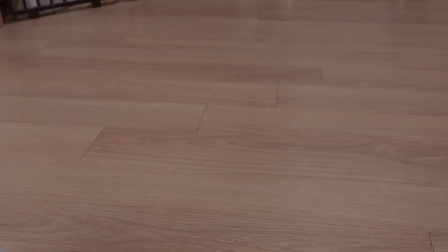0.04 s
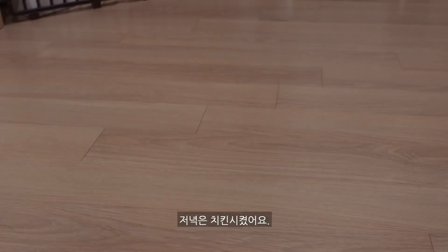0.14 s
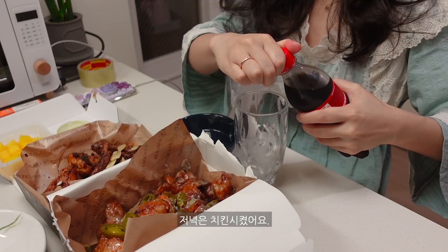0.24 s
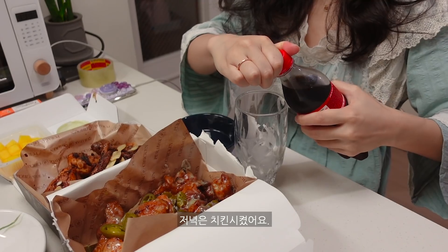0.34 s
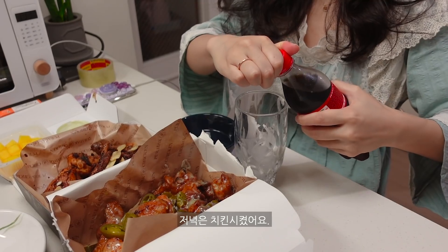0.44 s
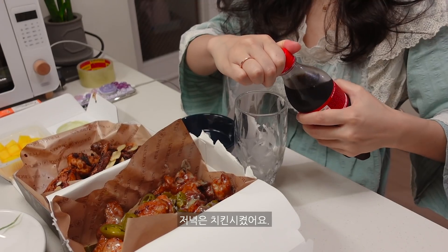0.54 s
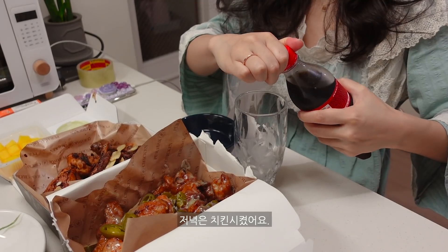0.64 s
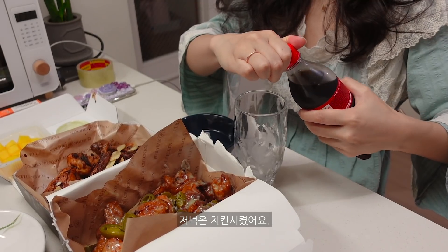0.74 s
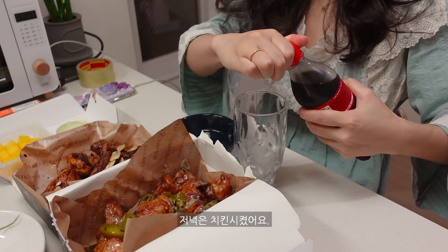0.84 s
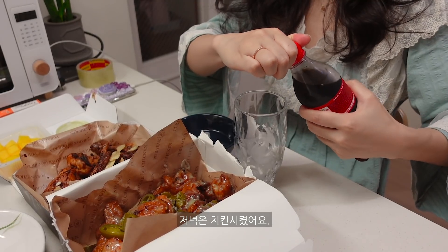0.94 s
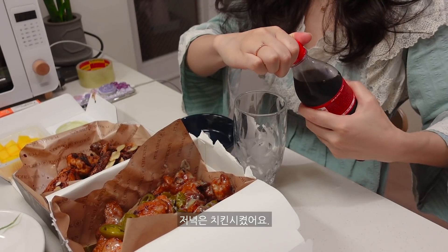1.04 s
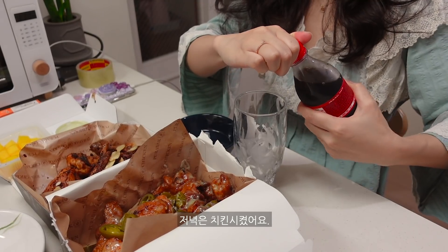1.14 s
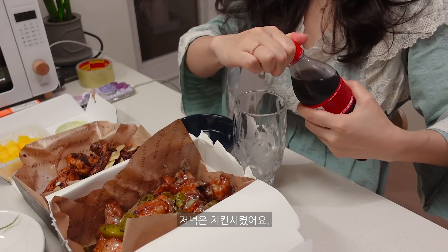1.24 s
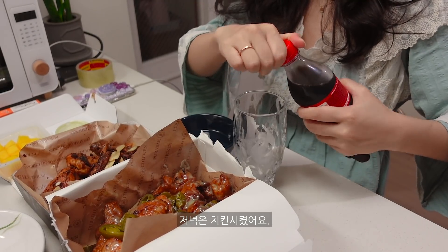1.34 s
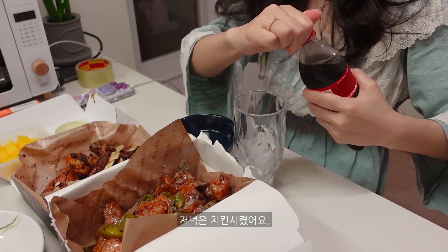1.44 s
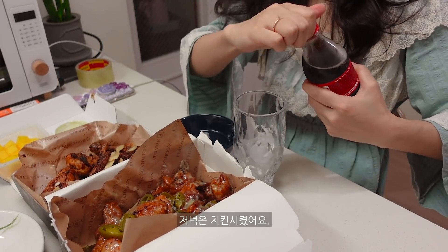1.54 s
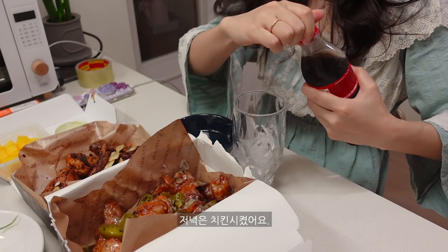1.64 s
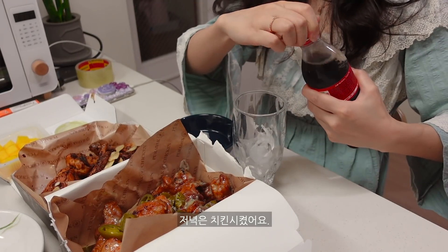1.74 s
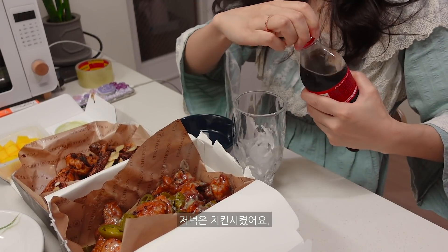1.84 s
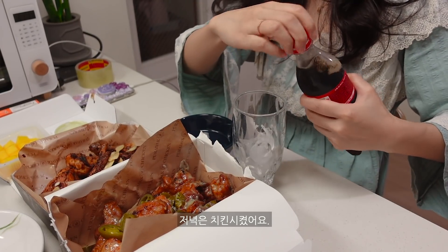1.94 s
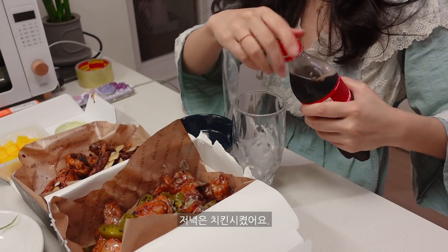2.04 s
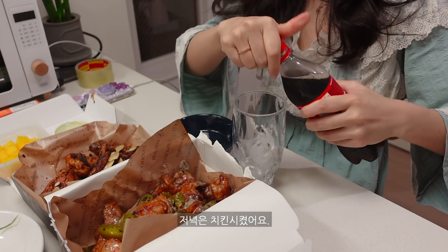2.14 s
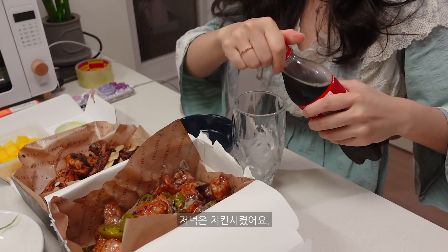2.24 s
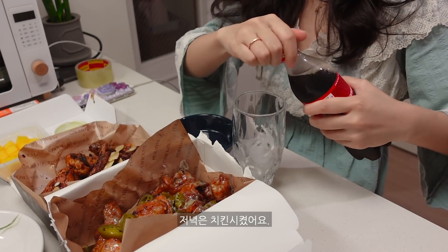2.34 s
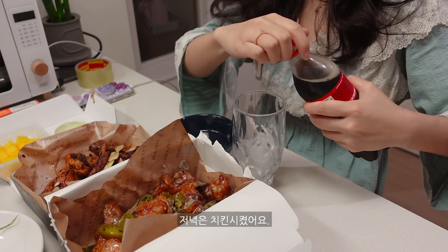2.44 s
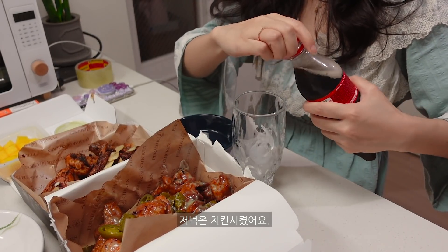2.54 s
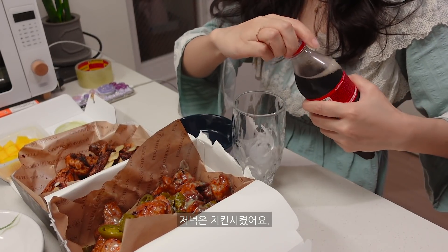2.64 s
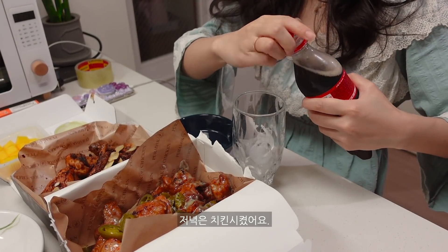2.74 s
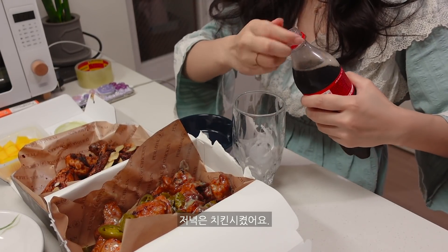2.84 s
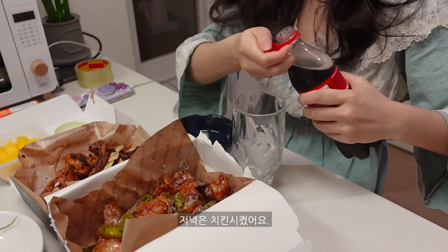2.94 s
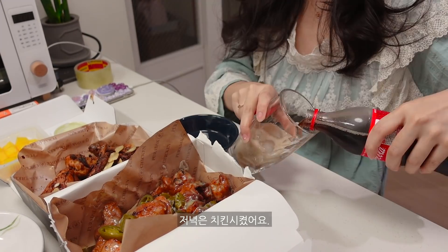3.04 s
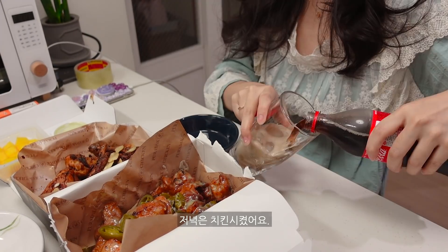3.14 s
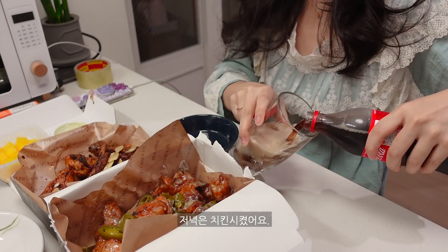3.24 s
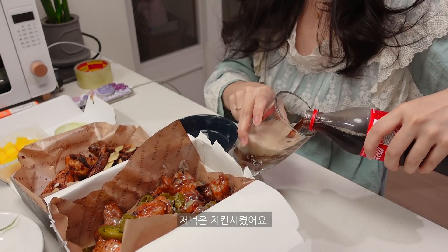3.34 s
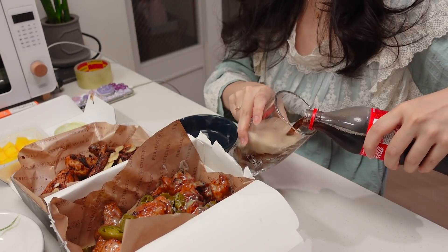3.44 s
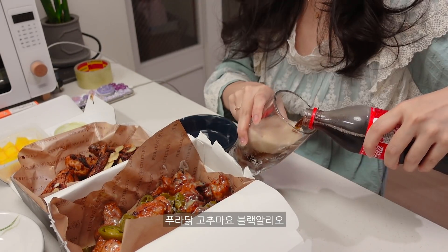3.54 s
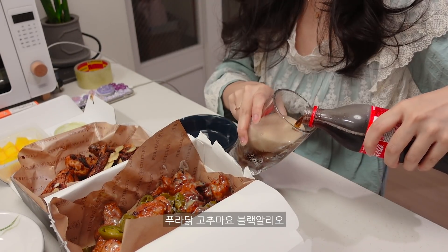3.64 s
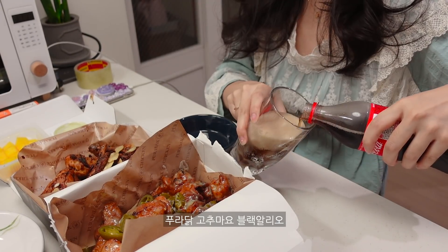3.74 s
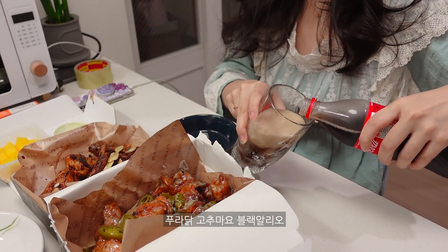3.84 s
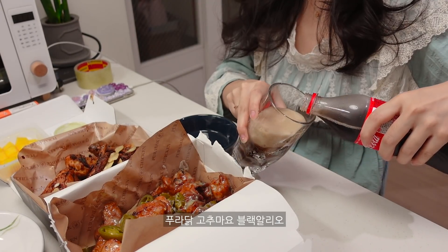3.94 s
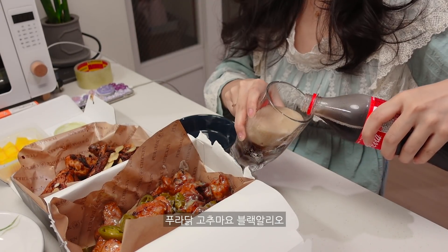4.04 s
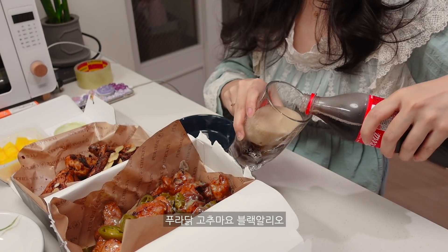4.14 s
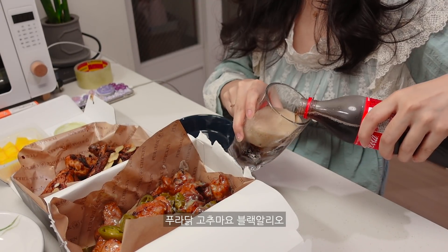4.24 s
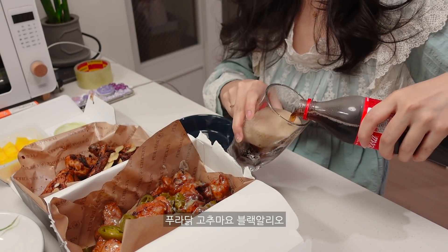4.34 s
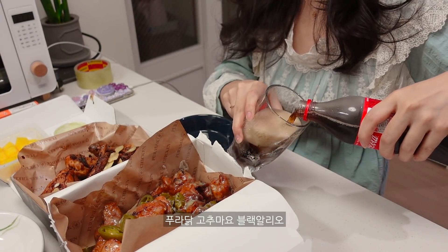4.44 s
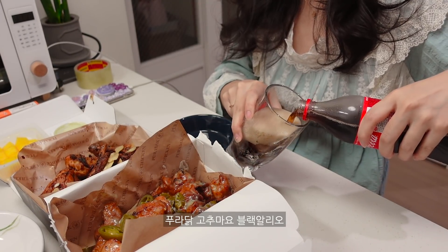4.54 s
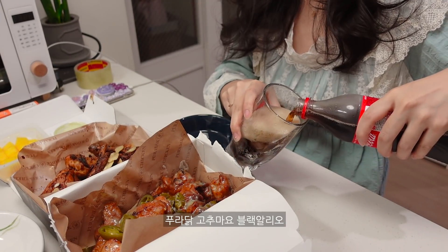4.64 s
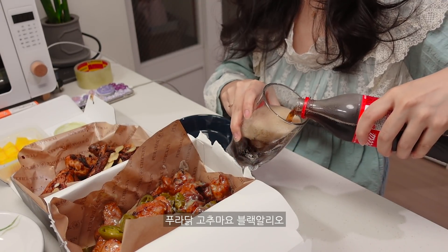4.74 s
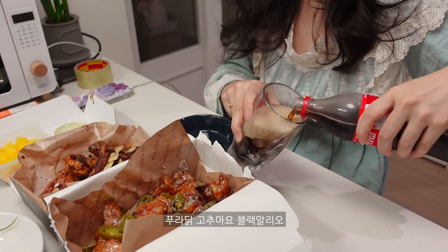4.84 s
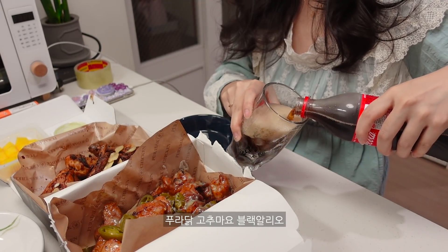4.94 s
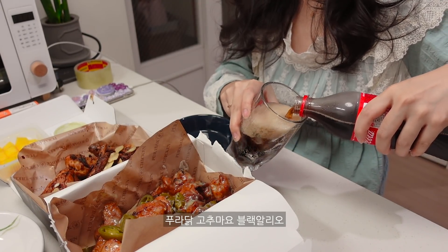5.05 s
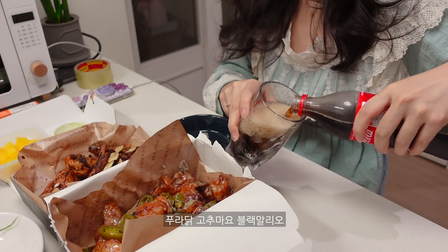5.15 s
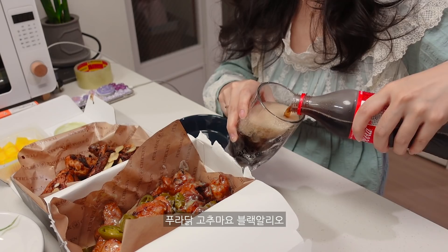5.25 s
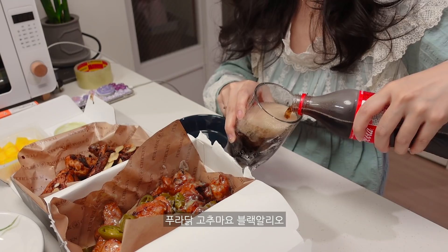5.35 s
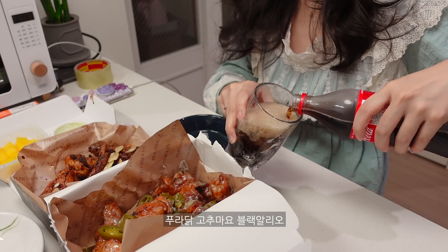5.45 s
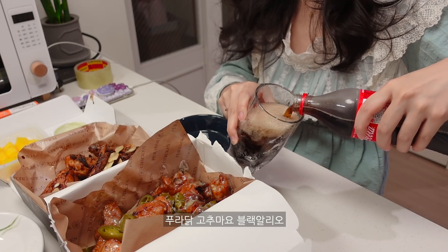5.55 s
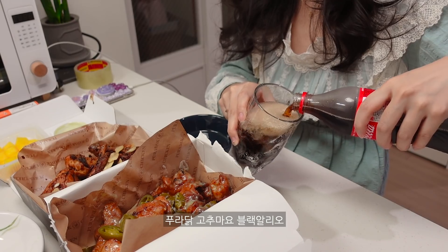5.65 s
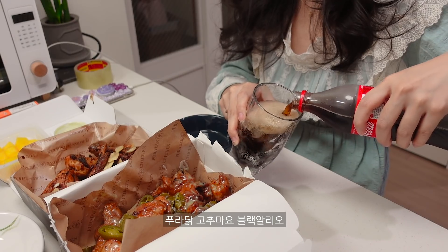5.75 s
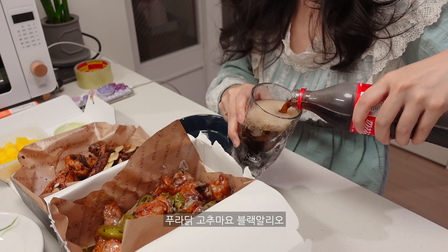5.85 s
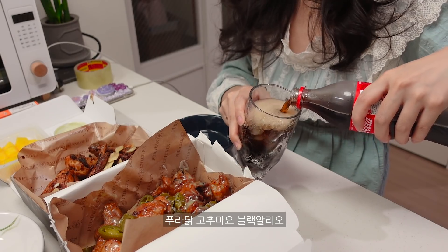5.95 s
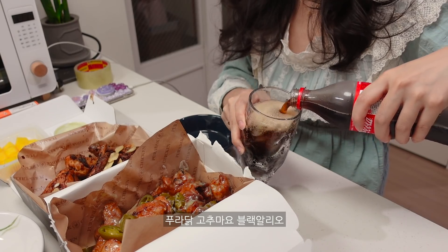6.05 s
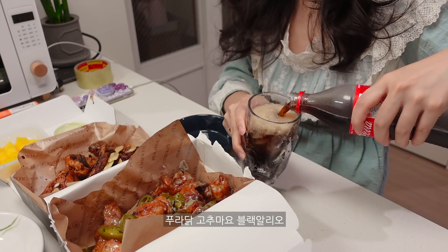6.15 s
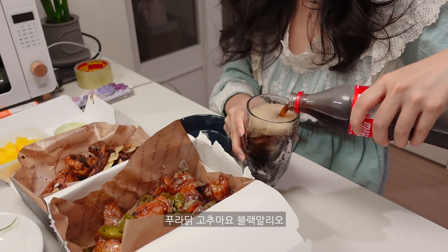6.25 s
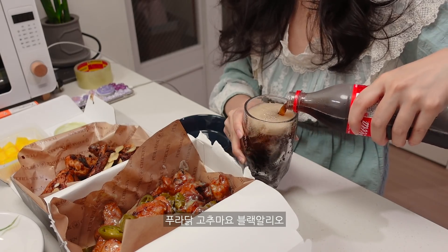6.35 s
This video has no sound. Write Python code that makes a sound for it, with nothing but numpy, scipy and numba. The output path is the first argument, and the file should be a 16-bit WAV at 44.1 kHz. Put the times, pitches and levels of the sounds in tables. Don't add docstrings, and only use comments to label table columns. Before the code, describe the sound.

A pet's small bell jingles briefly, then a plastic soda cap hisses and cracks open, and fizzy drink glugs into a glass in a kitchen.

```python
import sys
import numpy as np
from scipy import signal
from scipy.fft import rfft, irfft
from scipy.io import wavfile
from scipy.ndimage import uniform_filter1d
from numba import njit

SR = 44100
rng = np.random.default_rng(int(sys.argv[2]) if len(sys.argv) > 2 else 0)


def wav_record(signal):
    frames = np.transpose(np.atleast_2d(signal))
    bounded = np.clip(frames, -1, 1)
    quanta = np.round(bounded * 32767).astype(np.int16)
    wavfile.write(sys.argv[1], SR, quanta)


def elevation(decibels):
    levels = np.asarray(decibels, float)
    return 10 ** (levels / 20)


N = 282240
T = np.arange(N) / SR

CUTS_S = [
    .2425,
    3.113,
]

# (time [s], level [dB], brightness [dB])
BELL_SHAKES = [
    (.001, -26.5, -4),
    (.012, -28.5, -12),
    (0.026, -33, -4),
    (0.049, -40, -8),
    (0.077, -30.5, 5),
    (0.092, -35, 1),
    (.11, -37.5, 10),
    (.128, -39, 0),
    (.145, -59, -2),
    (0.171, -54, 2),
]
# (frequency [Hz], level [dB], t60 [s])
BELL_MODES = [(2842, 3.5, 0.3), (2640, -8, 0.17), (2740, -8, 0.13), (5370, 1.5, 0.059), (5440, 0, 0.094),
              (5920, -3, 0.095), (5480, -2, 0.046), (5900, -11, 0.061), (7900, -1.5, 0.19), (7770, -8, .15),
              (11100, -25, 0.18), (11530, -13, 0.16), (12600, -28, .25), (13700, -32.5, 0.34)]
# (time [s], level [dB])
PAWS = [
    (0.0, -40.5),
    (0.01, -45),
    (0.052, -49),
    (0.146, -51),
    (0.216, -56),
    (0.24, -45),
]
# (frequency [Hz], density [dB per Hz])
PAWS_TONE = [(60, -41), (200, -13.5), (700, 1), (1600, -4.5), (3000, -4.5), (5500, 0.5), (7500, -6),
             (9000, -16), (11500, -21), (12500, -61)]

# (time [s], pitch [Hz], level [dB], t60 [s])
HOLLOW_TAPS = [
    (0.229, 782, -33, 0.056),
    (0.229, 1197, -32.5, 0.038),
    (0.225, 1760, -41, 0.089),
    (1.39, 487, -57, 0.18),
    (2.84, 1129, -50, 0.62),
    (2.96, 652, -50.5, 0.22),
    (3.049, 637, -47.5, 0.23),
    (3.114, 946, -45, 0.14),
]

# (time [s], level [dB])
GAS_FLOW = [
    (0.243, -29.5),
    (0.275, -27.5),
    (0.45, -38),
    (0.56, -40),
    (0.698, -44),
    (0.85, -38),
    (0.89, -33.5),
    (1.044, -30.5),
    (1.2, -71),
]
# (frequency [Hz], density [dB per Hz])
GAS_TONE = [(300, -63), (900, -18.5), (1700, -11), (2400, -5), (3500, -2.5), (5000, -2.5), (10000, 2),
            (15000, -4.5), (16400, -42)]
# (centre [Hz], width [Hz], level [dB], share by which the pitch sinks [0-1])
THREAD_GAPS = [(2900, 410, 9, 0.24), (4710, 540, 8.5, 0.081), (5720, 360, 1.5, 0.028),
               (6920, 750, -1.5, .02), (7800, 1100, -4.5, .02), (9000, 140, -5, 0.024),
               (10300, 310, -1, 0.02), (10770, 200, -4, 0.018)]
# (time [s], lift [0-1])
CAP_LIFT = [
    (.25, 0.06),
    (.6, 0.08),
    (.85, 0.63),
    (1.1, 0.93),
]
JET_TREBLE_DB, JET_DULLS_DB, SPIT_DB, SPIT_S = -2.5, -4.5, 8.5, 0.011

# (frequency [Hz], density [dB per Hz])
KITCHEN_TONE = [(18, -70), (30, -36.5), (282, -15), (532, -16), (975, -2.5), (1240, -3), (1410, -4),
                (1610, -5), (2330, -8), (2590, -10.5), (2800, -10), (7430, -21.5), (15200, -56),
                (16400, -56)]
KITCHEN_DB = -56.5
# (frequency [Hz], density [dB per Hz])
MIC_HISS = [(3000, -24), (7000, 1), (11000, 6), (15500, -1), (16500, -20)]

# (time [s], peak [dB], ring [Hz], treble [dB], scrape [s])
CAP_SNAPS = [(1.312, -42, 5500, -22, .002), (1.389, -36.5, 3950, -9.5, 0.012),
             (1.51, -32.5, 3290, -11.5, 0.042), (1.570, -36.5, 3660, -6, 0.0048),
             (1.740, -46.5, 3040, -44, 0.0068), (1.784, -25.5, 6330, -15, 0.0034),
             (1.97, -16.5, 5110, -11, 0.0037), (2.351, -56, 5000, -19, .001),
             (2.369, -48, 5470, -15, 0.00077), (2.394, -46, 5060, -21, 0.0012),
             (2.426, -22.5, 5820, -17, 0.0023), (2.633, -43.5, 4000, -25, 0.0065),
             (2.637, -37.5, 2150, -30, 0.0045), (2.713, -17.5, 4880, -10, 0.003),
             (2.855, -18, 4460, -12.5, 0.0043), (2.88, -21, 3480, -9, 0.0018),
             (2.9613, -16.5, 3500, -6, 0.0032), (2.9948, -17, 4050, -15, 0.0039),
             (3.028, -30.5, 3250, -23, .002), (3.046, -14, 3150, -6.5, 0.0029),
             (3.051, -36, 2680, -20, 0.047)]
# (time [s], pitch [Hz], level [dB])
SQUEAK = [
    (2.11, 2510, -77),
    (2.136, 2520, -59),
    (2.25, 2540, -67),
    (2.29, 2360, -87),
]
WALL_DB, WALL_DB_PER_MS = -29.5, 2.6

# (time [s], level [dB])
STREAM_FLOW = [
    (3.11, -54.5),
    (3.38, -58),
    (3.65, -53),
    (4.97, -52),
    (6.12, -54.5),
    (6.4, -60.5),
]
# (frequency [Hz], density [dB per Hz])
STREAM_TONE = [(35, -83), (60, -55), (303, -50), (508, -7), (740, -14.5), (1100, 0), (1530, -6.5),
               (2340, 4), (4620, 0.5), (6560, -4), (13600, -13.5), (15300, -6), (16400, -48)]
# (frequency [Hz], density [dB per Hz])
FOAM_TONE = [(5000, -25), (7000, -9.5), (9300, 3.5), (11000, -5), (13600, -2.5), (16400, -19.5)]
HEAD_DB, HEAD_SWELL_DB, HEAD_PEAK_S, HEAD_SPREAD_S = -67.5, 7.5, 3.68, 0.49
# (time [s], peak [dB], splash over bubble [dB], length [s])
GLUGS = [(3.218, -48.5, -8, 0.11), (3.313, -53.5, 1, 0.088), (3.386, -46, -5, 0.066),
         (3.44, -49.5, 6.5, 0.046), (3.561, -42.5, -9, 0.066), (3.627, -42, 11, 0.021),
         (3.777, -35, 1, 0.019), (3.853, -34, -2.5, 0.027), (3.927, -37, 6, 0.019),
         (4.001, -40.5, 2, 0.036), (4.111, -33.5, -2, 0.04), (4.26, -46, -3, 0.037), (4.353, -36, 6, 0.024),
         (4.451, -34.5, 3.5, 0.029), (4.511, -36.5, -11, 0.019), (4.58, -33, -5, 0.032),
         (4.761, -43, 2, 0.033), (4.908, -42, 5, 0.039), (5.03, -42, 4, 0.034), (5.093, -42, 8, .02),
         (5.17, -28, -2.5, 0.032), (5.33, -46, 6.5, 0.064), (5.498, -38.5, 3.5, 0.021),
         (5.622, -46, 4, 0.044), (5.696, -39.5, -2, 0.028), (5.758, -44.5, -1, 0.034),
         (5.815, -44.5, 3, 0.026), (5.974, -41, 1, 0.043), (6.04, -40.5, -3.5, 0.066),
         (6.124, -42.5, -6, 0.045)]
GULP_HZ, GULP_SPREAD = 1127, .07
# (centre [Hz], width [Hz], level [dB])
GLASS = [(1108, 137, 3), (491, 124, -10), (1590, 1220, 9), (2440, 1080, 3.5), (3870, 240, -3.5),
         (4500, 290, -3.5)]
SPRAY_HZ, SPRAY_DB = 6700, -5
BUBBLES_DB, BUBBLE_LOW_HZ, BUBBLE_CYCLES = -12.5, 1306, 9.5
# (frequency [Hz], density [dB per Hz])
RUMBLE = [(40, -36), (120, -6), (220, 0.5), (400, -2), (800, -17)]

# (time [s], peak [dB], treble [dB])
KNOCKS = [
    (4.101, -37.5, -11),
    (5.17, -32, -24),
    (6.231, -15, -19),
]
# (frequency [Hz], level [dB], t60 [s])
RIM_MODES = [(1087, -5, 0.028), (1144, -6, 0.036), (537, -20, 0.07), (2150, -0.5, 0.026),
             (3500, -9, 0.0072), (4660, 1.5, 0.022), (5860, -15, .02)]

# (frequency [Hz], t60 [s])
ROOM_T60 = [(250, 0.37), (1000, 0.33), (3000, 0.48), (7000, 0.36), (14000, 0.4)]
ROOM_DB = -5.5


def unit(x):
    return x / np.sqrt(np.mean(x ** 2))


def curves(table, off_db=-120):
    s, *columns = np.transpose(table)
    return [np.interp(T, s, c, off_db, off_db) for c in columns]


def noise(tone, alike=1.):
    hz, db = np.transpose(tone)
    log_hz = np.log(np.fft.rfftfreq(N, 1 / SR) + 1)
    gain = elevation(np.interp(log_hz, np.log(hz), db, -70, -90))
    mid, side = irfft(rfft(rng.standard_normal((2, N))) * gain, N)
    alike = np.clip(alike, 0, 1)
    return unit(np.sqrt(1 + alike) * mid + np.sqrt(1 - alike) * side * np.array([[1], [-1]]))


def band(x, hz, width):
    return signal.lfilter(*signal.iirpeak(hz, hz / width, SR), x)


def steep_band(x, hz, width):
    return band(band(x, hz, width), hz, width)


def steep(x, hz, order=4):
    return signal.sosfilt(signal.butter(order, hz, "high", fs=SR, output="sos"), x)


@njit
def sliding(x, g, k):
    y, b, l = np.empty(len(x)), 0., 0.
    for i in range(len(x)):
        v = (b + g[i] * (x[i] - l)) / (1 + g[i] * (g[i] + k))
        b, l, y[i] = 2 * v - b, l + 2 * g[i] * v, k * v
    return y


def walk(rate):
    k = int(SR / rate)
    steps = np.repeat(rng.standard_normal(N // k + 1), k)
    return unit(uniform_filter1d(uniform_filter1d(steps, k), k)[:N])


@njit
def rings(start, hz, size, t60, glide, length):
    out = np.zeros(length)
    for k in range(len(start)):
        phase, gain, step = 0., size[k], 2 * np.pi * hz[k] / 44100
        fall = np.exp(-6.9 / (t60[k] * 44100))
        for i in range(start[k], min(length, start[k] + int(t60[k] * 44100))):
            out[i] += gain * np.sin(phase)
            phase, gain, step = phase + step, gain * fall, step * (1 + glide[k] / 44100)
    return out


def ring(s, hz, db, t60, glide=0.):
    s, hz, db, t60, glide = (np.ravel(a) * 1. for a in np.broadcast_arrays(s, hz, db, t60, glide))
    start = (s * SR).astype(np.int64)
    return rings(start, np.clip(hz, 20, 20000), elevation(db), np.maximum(t60, 1e-4), glide, N)


def puffs(s, db, rise_s, fall_s):
    env = np.zeros(N)
    for a, d, rise, fall in np.broadcast(s, db, rise_s, fall_s):
        rise, fall = max(rise, 1e-5), max(fall, 1e-4)
        i, t = int(a * SR), T[:int(8 * fall * SR)]
        puff = elevation(d) * (1 - np.exp(-t / rise)) * np.exp(-t / fall)
        env[i:i + len(t)] += puff[:N - i]
    return env


def crack(hz, body_db, treble_db, scrape, span):
    t = T[:span]
    push = rng.standard_normal(span) * np.exp(-t / scrape) * np.clip((scrape / 0.008) ** 2, 0, 1)
    push[0] += 2.5
    push[int(.0011 * SR)] -= .2
    push += 0.17 * rng.standard_normal(span) * np.exp(-t / 0.0016)
    shell = steep_band(push, hz, 1.21 * hz) + 0.5 * band(push, hz, 0.073 * hz)
    shell += elevation(body_db - 1) * steep_band(push, 1700, 2700)
    shell = signal.lfilter(*signal.butter(2, min(1.82 * hz, 15000), fs=SR), shell)
    edge = band(push, 8100, 2800) + 0.58 * band(push, 12600, 4500)
    out = shell + elevation(treble_db + 2.5) * steep(edge, 6500, order=2)
    return out / abs(out).max()


def room(x):
    t, (hz, t60) = T[:SR // 2], np.transpose(ROOM_T60)
    tail = np.zeros((2, len(t)))
    for f in 200 * np.sqrt(2) ** np.arange(13):
        decay = elevation(-60 * t / np.interp(f, hz, t60))
        tail += band(rng.standard_normal((2, len(t))), f, f / 2) * decay / np.sqrt(f)
    mid, side = tail
    tail = mid + 0.51 * steep(side, 900, order=1) * np.array([[1], [-1]])
    tail = signal.lfilter([1, -.8], 1, tail) * np.clip((t - .003) / 0.0011, 0, 1)
    tail *= elevation(ROOM_DB) / np.sqrt(np.sum(tail ** 2) / 2)
    x = x * np.ones((2, 1))
    return x + signal.fftconvolve(x, tail, axes=1)[:, :N]


def pet():
    s, db, bright_db = np.transpose(BELL_SHAKES)[:, :, None]
    hz, mode_db, t60 = np.transpose(BELL_MODES)
    scatter = rng.standard_normal((len(s), len(hz)))
    strike_db = db - 11.5 + mode_db + bright_db * (hz > 7000) + 1.7 * scatter
    bell = ring(s + 0.0029 * abs(scatter), hz, strike_db, t60)
    boards = noise(PAWS_TONE, 0.73)
    boards += 1.2 * band(boards, 760, 70) + 0.5 * band(boards, 890, 44) + 1.7 * band(boards, 1550, 130)
    scuff_db = np.interp(T, *np.transpose(PAWS)) + 5.5 + 2.0 * walk(44.3)
    return room(bell) + elevation(scuff_db) * boards


def hollow():
    out = np.zeros(N)
    for s, hz, db, t60 in HOLLOW_TAPS:
        out += unit(steep_band(rng.standard_normal(N), hz, 72)) * puffs(s, db, 0.0036, t60 / 6)
    return out


def splice_ticks():
    first, second = CUTS_S
    return puffs([first - .001, second], [-46, -48], 0.00016, 0.00098)


def gas():
    db, = curves(GAS_FLOW)
    lift, wobble = np.interp(T, *np.transpose(CAP_LIFT)), 1 + .01 * walk(14.0)
    spit = np.exp(-abs(T - GAS_FLOW[0][0]) / SPIT_S)
    treble_db = JET_TREBLE_DB + JET_DULLS_DB * lift + SPIT_DB * spit
    jet = noise(GAS_TONE, 1.0)
    gaps = np.zeros((2, N))
    for hz, width, gap_db, sink in THREAD_GAPS:
        tuning = np.tan(np.pi * hz * wobble * (1 - sink * lift) / SR)
        gaps += elevation(gap_db) * np.array([sliding(side, tuning, width / hz) for side in jet])
    jet = jet + gaps
    high = steep(jet, 5800, order=3)
    air = unit(steep_band(rng.standard_normal(N), 254, 50))
    jet = unit(jet - high) + elevation(treble_db) * unit(high) + elevation(-43.5) * air * (0.17 + lift)
    return jet * elevation(db + 1.2 * walk(58.4) + 0.43 * walk(330))


def kitchen_hum():
    return noise(KITCHEN_TONE, 0.67) * elevation(KITCHEN_DB + 1.0 * walk(6.45)) + elevation(-75) * noise(MIC_HISS, 0.49)


def cap():
    out = np.zeros(N)
    span = SR // 4
    for s, db, hz, treble_db, scrape in CAP_SNAPS:
        i = int(s * SR)
        wall_db = WALL_DB + WALL_DB_PER_MS * min(1000 * scrape, 12)
        out[i:i + span] += elevation(db + 8.5) * crack(hz, wall_db, treble_db, scrape, span)
    hz, db = curves(SQUEAK)
    squeak = elevation(db + 4.5 + .4 * walk(30)) * np.sin(2 * np.pi * np.cumsum(hz) / SR)
    return steep(out, 1400, order=3) + squeak


def stream(stream_db):
    hiss = noise(STREAM_TONE, 0.76)
    hiss += 0.97 * band(hiss, 4720, 300) + .5 * band(hiss, 3880, 270) + 0.76 * band(hiss, 1240, 220)
    return hiss * elevation(stream_db + 0.3 + 1.55 * walk(24.79))


def bubbles(count, low_hz, octave_ratio, size_db, cycles, glide):
    when, pitch, size = rng.random((count, 3)).T
    hz = low_hz * octave_ratio ** pitch
    s = CUTS_S[1] + when * (N / SR - CUTS_S[1])
    return ring(s, hz, size_db * np.log(size), cycles / hz, glide)


def glugs():
    s, db, upper_db, length = np.transpose(GLUGS)
    gulp_hz = GULP_HZ * (1 + GULP_SPREAD * rng.standard_normal(len(s)))
    churn = rng.standard_normal(N) * elevation(1.25 * walk(250))
    low, *upper = (elevation(d) * unit(steep_band(churn, f, 1.26 * w)) for f, w, d in GLASS)
    upper.append(elevation(SPRAY_DB) * unit(steep_band(churn, SPRAY_HZ, 3200)))
    body = low + upper[0] + upper[1]
    cloud = body * puffs(s - .004, db + 0.24 * upper_db - 10.0, 0.014, length / 2)
    splash = sum(upper[2:]) * puffs(s - .003, db + upper_db - 7, 0.0093, 0.43 * length)
    gulp = ring(s + 0.0099, gulp_hz, db - 0.63 * upper_db - 9, 0.04, 2.2)
    return cloud + splash + gulp


def pour():
    stream_db, = curves(STREAM_FLOW)
    foam_db = HEAD_DB + HEAD_SWELL_DB * np.exp(-((T - HEAD_PEAK_S) / HEAD_SPREAD_S) ** 2)
    foam = noise(FOAM_TONE, 0.83) * elevation(foam_db + 7.5 + 0.28 * walk(34))
    pops = unit(bubbles(6000, 2500, 5, -3.5, 9, 40)) * elevation(foam_db - 7.5)
    blips = bubbles(1500, BUBBLE_LOW_HZ, 4.5, -3.0, BUBBLE_CYCLES, 25)
    blips = unit(steep(blips, 1000, order=3)) * elevation(stream_db + BUBBLES_DB)
    return stream(stream_db) + foam + steep(room(glugs() + pops + blips), 475, order=4)


def knocks():
    hz, mode_db, t60 = np.transpose(RIM_MODES)
    out, span = np.zeros(N), SR // 8
    for s, db, treble_db in KNOCKS:
        i = int(s * SR)
        out += ring(s, hz, db + mode_db - 7, t60)
        out[i:i + span] += elevation(db) * crack(3300, -2, treble_db, 0.0074, span)
    return out


def scene():
    first, second = CUTS_S
    snaps = cap() * elevation(np.array([[-.6], [.6]]))
    hands = room(elevation(4.0) * gas() + snaps) * elevation(np.array([[-.8], [.8]]))
    opening = (hands + kitchen_hum() * (T < second)) * (T >= first)
    opening = opening * np.clip(1 - (T - second) / 0.026, 0, 1)
    knock = steep(room(knocks()), 610, order=4)
    knock = knock * elevation(-170 * np.clip(T - 6.255, 0, 1))
    pouring = pour() * elevation(np.array([[.3], [-.3]])) + knock + elevation(-93.5) * noise(RUMBLE, 1.0)
    pouring = pouring * np.clip((T - second) / 0.016, 0, 1)
    return pet() * (T < first) + hollow() + splice_ticks() + opening + pouring


def low_pass(x):
    return signal.sosfilt(signal.butter(12, 16660, fs=SR, output="sos"), x)


def record(dry):
    top = .36
    mix = steep(top * np.tanh(dry / top), 130, order=1)
    return low_pass(mix)


dry = scene()
out = record(dry)
wav_record(out)
```